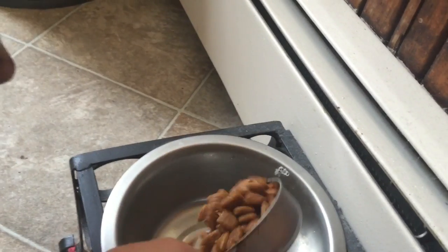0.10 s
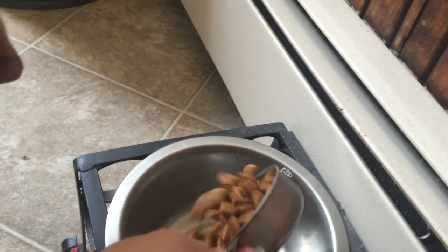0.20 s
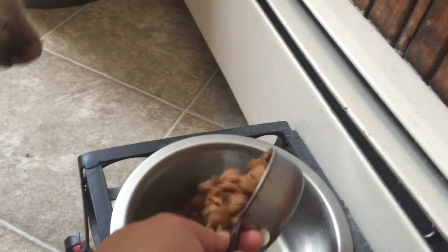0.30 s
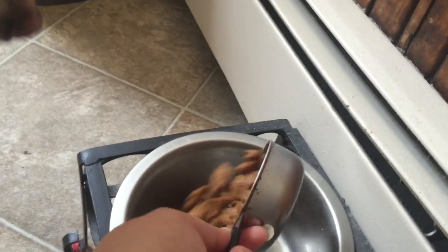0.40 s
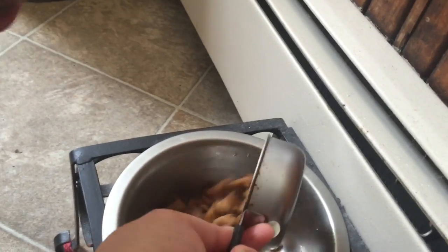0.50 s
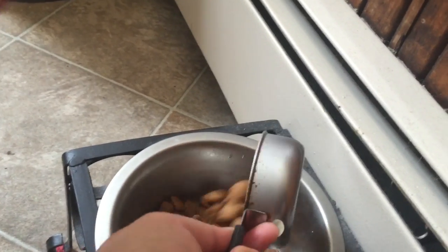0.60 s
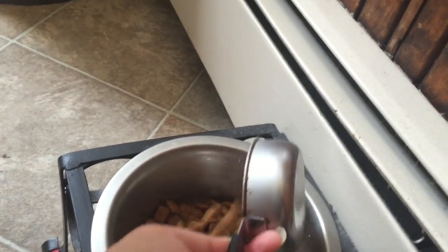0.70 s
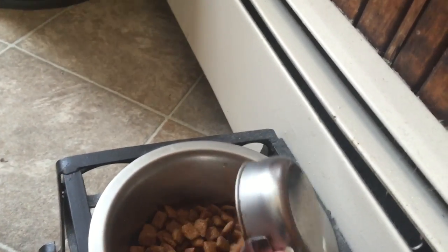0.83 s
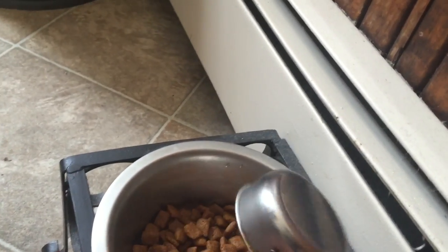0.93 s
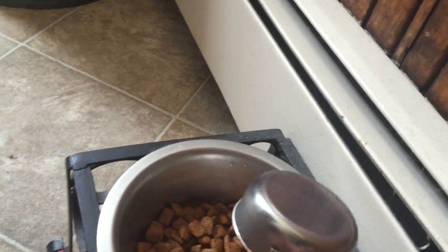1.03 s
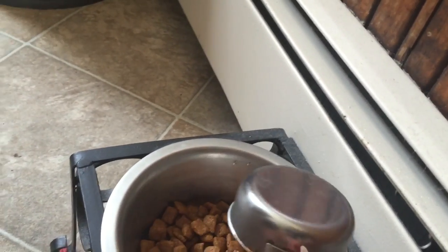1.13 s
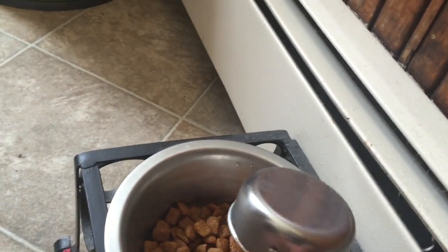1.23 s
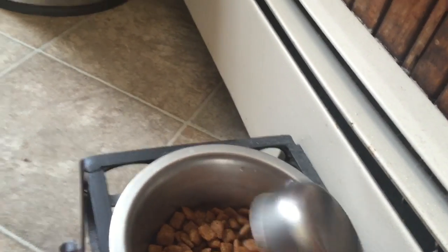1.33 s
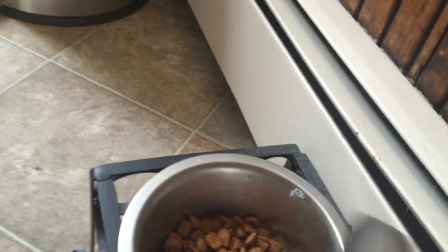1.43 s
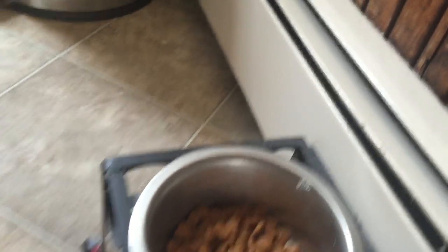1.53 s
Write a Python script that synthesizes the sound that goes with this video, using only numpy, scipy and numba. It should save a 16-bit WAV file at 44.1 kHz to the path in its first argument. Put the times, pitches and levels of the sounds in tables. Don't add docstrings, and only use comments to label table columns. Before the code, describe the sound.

Dry kibble pours into a steel bowl, heard close in a small quiet kitchen. Faint cup ticks at 0.14-0.18 s, then a loud burst of bright clangs from 0.22 s. Ringing is choked as the heap grows, turning to crunch and hollow knocks by 0.75-1.08 s. A crumb tinks at 1.11, the cup brushes away until 1.3, light ticks follow around 1.4, over low hum.

```python
import sys
import numpy as np
from scipy import signal
from scipy.fft import rfft, irfft, next_fast_len
from scipy.io import wavfile
from numba import njit

SR = 44100
rng = np.random.default_rng(int(sys.argv[2]) if len(sys.argv) > 2 else 0)


def gain_from_db(level_db):
    decades = np.asarray(level_db, float) / 20
    return 10 ** decades


def inscribe(sig):
    pcm = np.round(np.clip(np.atleast_2d(sig).T, -1, 1) * 32767)
    wavfile.write(sys.argv[1], SR, pcm.astype(np.int16))


N = 70560


def rms_one(x):
    return x / np.sqrt(np.mean(x ** 2) + 1e-20)


def in_time(rows):
    s, *columns = np.transpose(rows)
    return [np.interp(np.arange(N) / SR, s, column) for column in columns]


def filtered(x, order, hz, kind="high"):
    return signal.sosfilt(signal.butter(order, hz, kind, fs=SR, output="sos"), x)


def coloured(x, points):
    hz, db = np.transpose(points)
    grid = np.maximum(np.fft.rfftfreq(N, 1 / SR), 1)
    return irfft(rfft(x) * gain_from_db(np.interp(np.log(grid), np.log(hz), db)), N)


def clicks_at(s, db):
    out = np.zeros(N)
    np.add.at(out, (np.asarray(s) * SR).astype(int), gain_from_db(np.asarray(db)))
    return out


def burst(s, db, t60):
    return signal.lfilter([1], [1, -gain_from_db(-60 / (t60 * SR))], clicks_at(s, db))


def ring(clicks, hz, t60):
    r = gain_from_db(-60 / (max(t60, .002) * SR))
    w = 2 * np.pi * hz / SR
    return signal.lfilter([0, np.sin(w)], [1, -2 * r * np.cos(w), r * r], clicks + 1e-18)


# pitch_hz, level_db (per Hz)
ROOM_NOISE = [(26, -38), (45, -4), (138, -7.5), (241, -25.5), (487, -30.5), (1600, -35.5), (1770, -34),
              (1900, -36), (15000, -53)]
# pitch_hz, level_db
HUM = [(59, -57), (117, -54.5)]


def background():
    lines = sum(gain_from_db(db) * rms_one(ring(rng.standard_normal(N), hz, 0.65)) for hz, db in HUM)
    squeak_hz, squeak_db, squeak_end_s = 1840, -66.5, 0.33
    squeak = gain_from_db(squeak_db) * rms_one(ring(rng.standard_normal(N), squeak_hz, 0.033))
    squeak = squeak * (np.arange(N) < squeak_end_s * SR)
    noise = filtered(coloured(rng.standard_normal(N), ROOM_NOISE), 3, 48)
    hiss = gain_from_db(-80.5) * rng.standard_normal(N)
    return lines + squeak + hiss + gain_from_db(-51.5) * rms_one(noise)


def kitchen(x):
    room_t60_s, wall_cut_hz = 0.3, 2200
    size = next_fast_len(N + SR)
    w = 2 * np.pi * np.fft.rfftfreq(size)
    dull = 1 / (1 + 1j * w * SR / (2 * np.pi * wall_cut_hz)) ** .5
    echoes = 0
    for k, lag in enumerate(rng.uniform(.009, .035, 10) * SR):
        one_round = gain_from_db(-60 * lag / SR / room_t60_s) * dull * np.exp(-1j * w * lag)
        echoes = echoes + (-1) ** k * one_round / (1 - one_round)
    return irfft(rfft(x, size) * echoes, size)[:N]


# start_s, level_db, bare_steel_share_db
POUR = [(.225, -9, -10), (.28, -20, 6.5), (.36, -11.5, 3.5), (.44, -20, 12), (.492, -18, 6),
        (.54, -16.5, 11.5), (.6, -14.5, 2), (.66, -16, 5.5), (.7, -21, -3), (.79, -20.5, -6),
        (.85, -18.5, 9.5), (.915, -24, 2.5), (.98, -20.5, -27), (1.05, -25, -6), (1.11, -31.5, -2.5)]
POUR_START_S, POUR_END_S = POUR[0][0], POUR[-1][0]
CHOKE_DB_PER_S = 19.5


def shower(per_s, spread_db):
    t = np.arange(N) / SR
    sizes = gain_from_db(spread_db * np.minimum(rng.exponential(1, N), 4)) * rng.choice([-1, 1], N)
    hits = rms_one(sizes * (rng.random(N) < per_s / SR))
    return hits * ((t > POUR_START_S) & (t < POUR_END_S))


def stand():
    stand_hz, stand_t60_s, stand_db = 173, 0.19, -53.5
    shake = shower(200, 1.1) * gain_from_db(.5 * in_time(POUR)[0])
    drum = ring(ring(shake, stand_hz, stand_t60_s), stand_hz * 0.85, .04)
    return gain_from_db(stand_db) * rms_one(drum)


# start_s, level_db
BRUSH = [
    (1.15, -45),
    (1.2, -52),
    (1.245, -40.5),
    (1.278, -47),
    (1.31, -80),
    (1.36, -80),
]
# pitch_hz, level_db (per Hz)
BRUSH_COLOUR = [(180, -49.5), (300, -0.5), (486, -6), (603, -12), (1080, -8.5), (3640, -14.5), (7200, -4),
                (16000, -31)]
# pitch_hz, level_db, ring_t60_s
SCRAPE = [(1380, -12, 0.042), (4070, -4.5, 0.045), (7150, -6.5, 0.065), (7400, -1, 0.06), (8450, -10, .05),
          (9600, -4, 0.066)]


def brush():
    t = np.arange(N) / SR
    away_s, gone_s = BRUSH[0][0], BRUSH[-1][0]
    gate = np.interp(t, [away_s - .04, away_s, gone_s, gone_s + 0.071], [0, 1, 1, 0])
    slide_s, slide_db = .198, -57
    slide_times = [slide_s, slide_s + 0.0042, POUR_START_S, POUR_START_S + .01]
    slide = gain_from_db(slide_db) * np.interp(t, slide_times, [0.065, 3.6, 3.4, 0.065])
    rustle = rng.standard_normal(N) * gain_from_db(2.2 * rng.standard_normal(N))
    woken = sum(gain_from_db(db) * rms_one(ring(rustle, hz, t60)) for hz, db, t60 in SCRAPE)
    rub = rms_one(coloured(rustle, BRUSH_COLOUR))
    return gate * gain_from_db(in_time(BRUSH)[0]) * (rub + 0.23 * woken) + slide * rub


TWINS = [(1, 1), (1.006, .5), (.991, .3)]


def ticks(rows, modes, level_db, crack_db, crack_t60_s, crack_hz):
    s, db = np.transpose(rows)
    out = 0
    for hz, mode_db, t60 in modes:
        for ratio, share in TWINS:
            uneven_db = rng.normal(0, 3.6, len(s))
            knocks = clicks_at(s, db + level_db + mode_db + uneven_db)
            out = out + ring(knocks, hz * ratio, t60 * share)
    out = filtered(out, 4, modes[0][0] * .85)
    crack = filtered(rng.standard_normal(N), 2, [crack_hz, min(crack_hz * 2, 18000)], "band")
    return out + burst(s, db + crack_db, crack_t60_s) * rms_one(crack)


# start_s, peak_db
FIRST_TICKS = [
    (0.1391, -41.5),
    (0.1545, -27.5),
    (0.1844, -44.5),
]
LAST_TICK = [
    (1.1144, -17.5),
]
LATE_TICKS = [
    (1.3904, -24.5),
    (1.3979, -32.5),
    (1.4176, -42),
    (1.4371, -30),
]
DULL_TICK = [
    (1.569, -49.5),
]
# pitch_hz, level_db, ring_t60_s
FULL_CUP = [(1700, -6, .015), (3500, 0, .012), (7340, 0, .015)]
TIPPED_CUP = [(4274, -21, .5), (5300, -16, .1), (5819, -14, .35), (5990, -9, .12), (6218, -11, .35),
              (6896, -4, .3), (7450, -8, .2), (8150, -13, .25), (8333, -9, .3), (8570, -8, .16),
              (9534, 0, .15), (10100, -12, .25), (10670, -8, .1), (11700, -3, .08), (12370, -4, .09)]
EMPTY_CUP = [(5965, -13, .1), (7020, -22, .08), (8506, -11, .05), (9722, -15, .04), (10990, 0, .12),
             (13100, -8, .13), (15130, -10, .07)]
DULL_CUP = [(9700, 0, .02), (12600, 0, .03), (15000, 0, .02)]


def cup():
    first = ticks(FIRST_TICKS, FULL_CUP, -17, -10, 0.0043, crack_hz=3200)
    last = ticks(LAST_TICK, TIPPED_CUP, -14.5, -16, 0.078, crack_hz=6260)
    late = ticks(LATE_TICKS, EMPTY_CUP, -20.5, -18, 0.031, crack_hz=7400)
    dull = ticks(DULL_TICK, DULL_CUP, -20, -8, .02, crack_hz=9000)
    return first + last + late + dull


def grains(clicks, cycles, count=44):
    dealt = rng.integers(0, count, N)
    out = 0
    for k, hz in enumerate(np.linspace(20, 125, count) ** 2):
        out = out + ring(clicks * (dealt == k), hz, min(cycles / hz, .02)) * np.sqrt(hz / 3000)
    return out


# pitch_hz, level_db (per Hz)
CRUNCH = [(120, -61), (200, -9), (735, 3), (2290, -6.5), (3070, -2), (3560, -9), (6170, -3.5),
          (14100, -10.5), (16000, -10)]


def crunch():
    crumbs_per_s, crumb_spread_db, crumb_cycles, crunch_db = 7200, 2.5, 64, -8.5
    crumbs = grains(shower(crumbs_per_s, crumb_spread_db), crumb_cycles)
    full = rms_one(coloured(crumbs, CRUNCH))
    bright = filtered(full, 2, 1200)
    heap = np.clip((np.arange(N) / SR - POUR_START_S) / 0.45, 0, 1)
    return (heap * full + (1 - heap) * bright) * gain_from_db(in_time(POUR)[0] + crunch_db)


# start_s, bright_snap_db, hollow_thud_db
LANDINGS = [(0.759, -18, -24), (0.785, -6, -46), (0.843, 4, -17.5), (0.865, 2.5, -22), (0.901, -24, -30),
            (0.921, -9, -19.5), (0.94, -4, -16), (0.945, -9.5, -37.5), (0.973, 3, -21.5), (0.988, 1, -24),
            (1.003, -36, -20.5), (1.033, -4, -31), (1.04, -15, -24.5), (1.065, -4, -36), (1.077, -11, -57)]


def landings():
    thud_hz, thud_t60_s, snap_t60_s = 776, 0.02, 0.056
    knock_db, knock_t60_s = -14.5, 0.0022
    s, snap_db, thud_db = np.transpose(LANDINGS)
    soft = signal.lfilter([.15], [1, -.85], clicks_at(s, thud_db + 4.5))
    thud = ring(soft, thud_hz, thud_t60_s)
    thud = thud + 0.44 * ring(soft, thud_hz * 1.055, thud_t60_s)
    thud = thud - 0.27 * ring(soft, thud_hz * 0.568, thud_t60_s)
    snaps = rng.standard_normal(N) * gain_from_db(3.8 * rng.standard_normal(N))
    bright = filtered(coloured(snaps, CRUNCH), 1, 1500)
    swell = signal.lfilter([.02], [1, -.98], burst(s, snap_db - 14, snap_t60_s))
    knock = burst(s, np.maximum(snap_db, -14) + knock_db, knock_t60_s)
    return thud + (swell + knock) * rms_one(bright)


# start_s, deep_db, middle_db, bright_db
GONGS = [(0.22, -28.5, -10, -23), (.2514, -25.5, -19.5, -17), (.2913, -41, -15, -22.5),
         (.318, -27, -49, -44), (.346, -55, -12, -30), (0.3666, -33.5, -40, -11), (.411, -30, -10.5, -20.5),
         (0.444, -36.5, -39.5, -30.5), (0.502, -42, -8.5, -26), (.521, -31.5, -27, -12.5),
         (.572, -43, -14, -31.5), (.615, -34, -14, -17.5), (0.657, -61, -16.5, -45),
         (0.7075, -32.5, -13, -32), (0.754, -65, -41, -29), (.786, -62, -31, -22), (.801, -59, -48, -37),
         (.819, -35, -46, -17.5), (.865, -59, -35, -24), (.921, -58, -53, -32), (.989, -58, -51, -42)]
GONG_HZ = (413, 887, 3043)
GONG_T60_S = (0.52, 0.19, 0.26)
# pitch_hz, level_db, ring_t60_s
PARTNERS = [(674, -1.5, 0.2), (2690, -3, 0.25), (4151, -0.5, .4), (4975, -1.5, 0.26), (5620, 13, 0.24)]


def gongs():
    rise_s, slip_rad = .003, .15
    s, *tones_db = np.transpose(GONGS)
    t = np.arange(N) / SR
    load = np.cumsum(gain_from_db(CHOKE_DB_PER_S * np.maximum(t - POUR_START_S, 0))) / SR
    tones = list(zip(GONG_HZ, GONG_T60_S, tones_db))
    tones += [(hz, t60, tones_db[0] + db) for hz, db, t60 in PARTNERS]
    keep = np.exp(-1 / (rise_s * SR))
    out = 0
    for hz, t60, db in tones:
        lost = np.minimum(np.log(1000) * load / max(t60, .1), 600)
        phase = slip_rad * np.cumsum(rng.standard_normal(len(s)))
        strikes = np.zeros(N, complex)
        strikes[(s * SR).astype(int)] = gain_from_db(db) * np.exp(1j * phase)
        height = np.cumsum(strikes * np.exp(lost)) * np.exp(-lost)
        height = signal.lfilter([1 - keep], [1, -keep], height)
        out = out + (height * np.exp(2j * np.pi * hz * t)).imag
    hollow_hz, hollow_db, hollow_t60_s = 815, -42.5, 0.24
    return out + ring(clicks_at([LAST_TICK[0][0] - .03], [hollow_db]), hollow_hz, hollow_t60_s)


@njit
def loaded_ring(clicks, turns, losses, gains, choke):
    out = np.zeros(len(clicks))
    for k in range(len(turns)):
        state = 0j
        for i in range(len(clicks)):
            kept = 1 - losses[k] * choke[i]
            state = state * turns[k] * kept + clicks[i] * gains[k, i >> 5]
            out[i] += state.imag
    return out


# start_s, peak_db, low_wall_weight_db
CLANGS = [(0.222, 6.5, -3), (0.2514, -1, 11.5), (0.2913, 4, 0), (0.3357, 5, 2.5), (0.3534, 6, -10),
          (0.3673, -1, -6), (0.4116, 2, -3.5), (0.5067, -7.5, 3.5), (0.5212, -8.5, 5.5), (0.7083, -2, 4),
          (0.821, -4, 9)]
# pitch_hz, width_hz, level_db
WALL = [(901, 8, -18), (937, 14, -10), (1826, 14, -6.5), (1862, 8, -11), (1914, 6.8, -11.5),
        (1960, 6.7, -10.5), (2288, 2, -11), (2665, 6, -14), (3000, 8, -9), (3097, 8, -10)]
# pitch_hz, level_db
BOWL = [(3658, -18), (4151, -11), (4840, -3.5), (4946, -9), (5383, -2.5), (5419, -26), (5650, -4),
        (5600, -5.5), (5737, 1), (5970, -15.5), (6123, -1), (6240, -17), (6290, -4.5), (4720, -11),
        (6480, -11)]
# pitch_hz, spread_hz, level_db
RIM = [(6380, 60, -11), (6730, 52, -1), (6610, 19, -12), (7480, 18, 3.5), (7460, 74, 0), (8550, 45, 1.5),
       (9310, 21, -12), (9560, 11, 0.5), (11050, 33, -1), (10970, 200, -10.5), (12320, 190, -3),
       (12600, 87, -3.5), (14100, 86, 0), (15100, 130, -25)]


def bowl_modes():
    modes = [(hz, 9.9, db) for hz, db in BOWL]
    rim_width_hz, rim_scatter_hz, rim_db = 10, 74, -9
    for hz, spread, db in RIM:
        for k in (-1, 0, 1):
            shift_hz = (spread + rim_scatter_hz) * k * rng.uniform(1.0, 2.1)
            modes.append((hz + shift_hz, rim_width_hz, db + rim_db - 4.7 * abs(k)))
    minor_width_hz, minor_db = 110, -21.5
    minor_hz = np.linspace(1100, 15700, num=70) + rng.uniform(-100, 80, size=70)
    return modes + [(hz, minor_width_hz, minor_db) for hz in minor_hz]


def steel():
    pieces_per_s, piece_spread_db, steel_db, fade_db_per_s = 900, 3.0, -38, -6
    level_db, share_db = in_time(POUR)
    age = np.maximum(np.arange(N) / SR - POUR_START_S, 0)
    rain = shower(pieces_per_s, piece_spread_db)
    rain = rain * gain_from_db(level_db + share_db + fade_db_per_s * age + steel_db)
    rain = rain * np.minimum(age / 0.12, 1)
    s, peak_db, low_db = np.transpose(CLANGS)
    choke = gain_from_db(CHOKE_DB_PER_S * age)
    out = 0
    for modes, extra_db, rain_db in ((WALL, low_db, -1), (bowl_modes(), 0, 0)):
        hz, width, db = np.transpose(modes)
        shape = (len(hz), N // 32 + 1)
        mode_db = (db + 10 * np.log10(width / 10))[:, None]
        gains = gain_from_db(mode_db + 2.6 * rng.standard_normal(shape)) * rng.choice([-1, 1], shape)
        hits = rain * gain_from_db(rain_db) + clicks_at(s, peak_db + extra_db - 21)
        turns, losses = np.exp(2j * np.pi * hz / SR), np.pi * width / SR
        out = out + loaded_ring(hits, turns, losses, gains, choke)
    return out + burst(s, peak_db - 18.5, 0.017) * rng.standard_normal(N)


def scene():
    near = brush() + cup() + crunch() + landings() + gongs() + steel()
    near = filtered(near, 4, 340)
    return (near + gain_from_db(-15) * kitchen(near) + stand() + background())[None]


def low_pass(x):
    return signal.sosfilt(signal.butter(12, 16560, fs=SR, output="sos"), x)


def record(dry):
    held = dry / (1 + (dry / .8) ** 4) ** (1 / 4)
    held = filtered(held, 2, 42)
    mix = signal.sosfilt(signal.cheby2(14, 60, 16250, fs=SR, output="sos"), held)
    return low_pass(mix)


dry = scene()
out = record(dry)
inscribe(out)
```